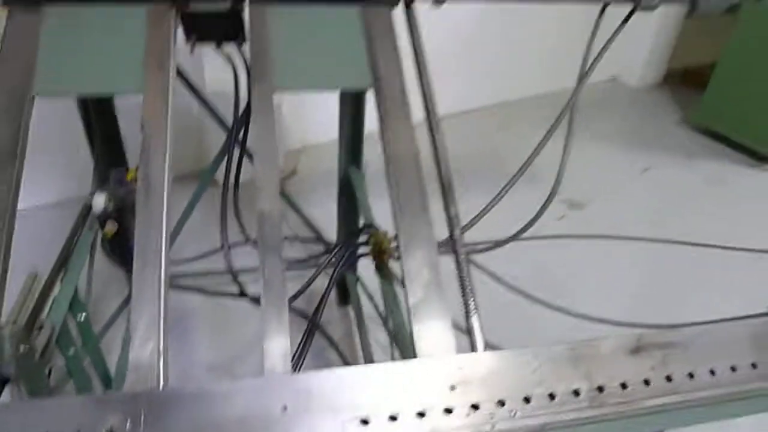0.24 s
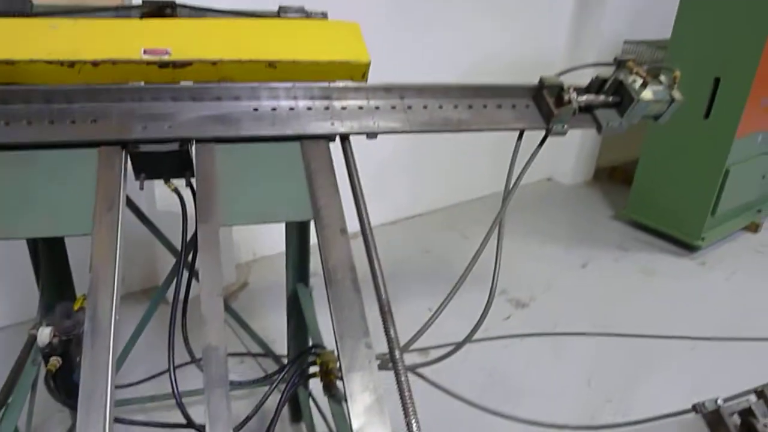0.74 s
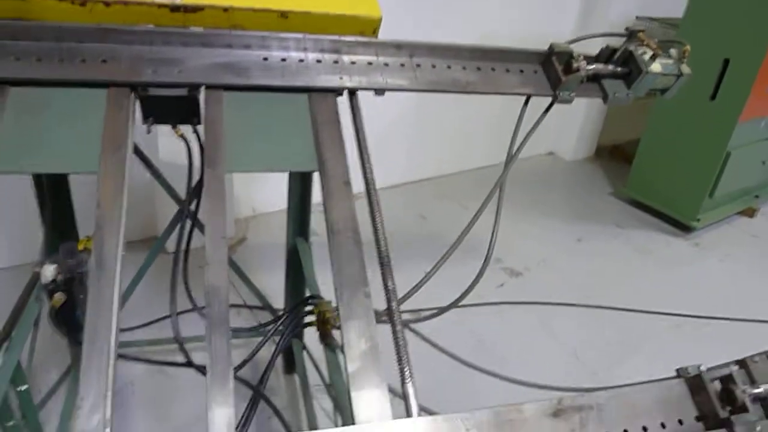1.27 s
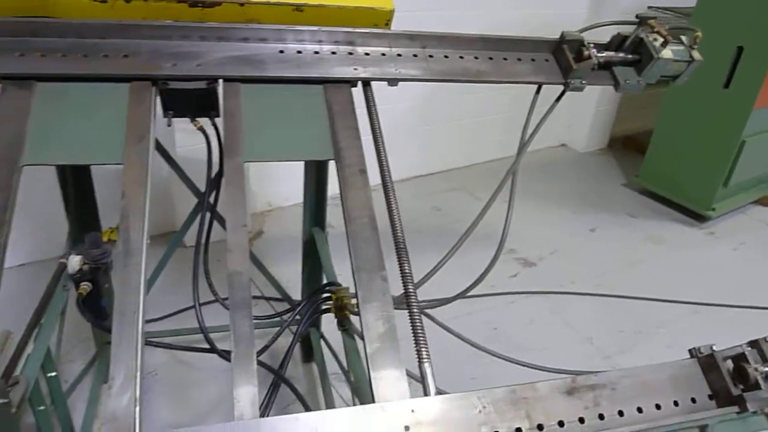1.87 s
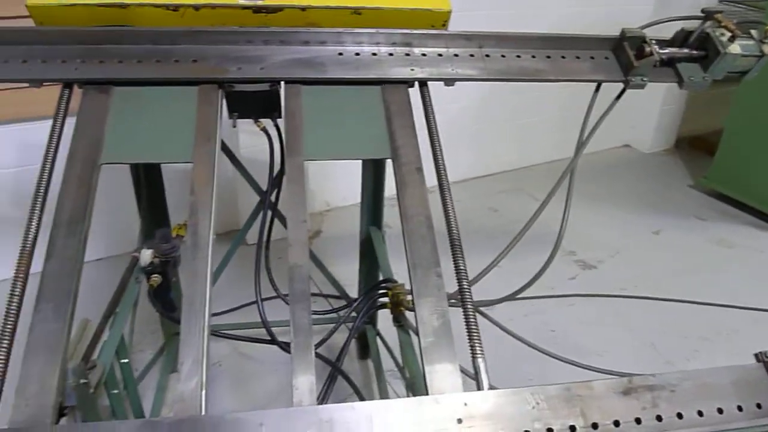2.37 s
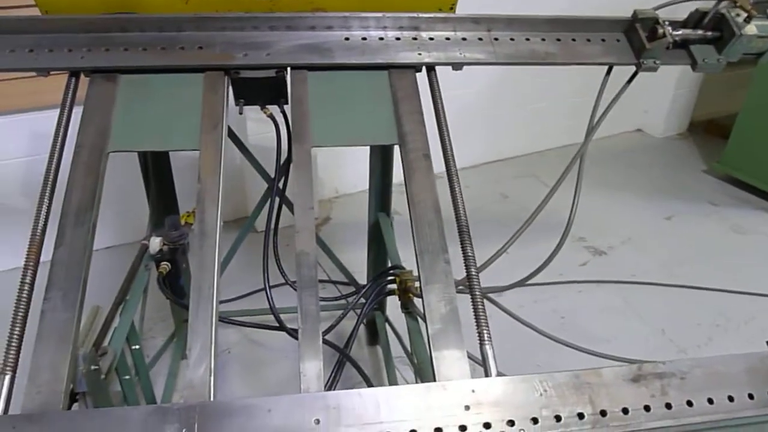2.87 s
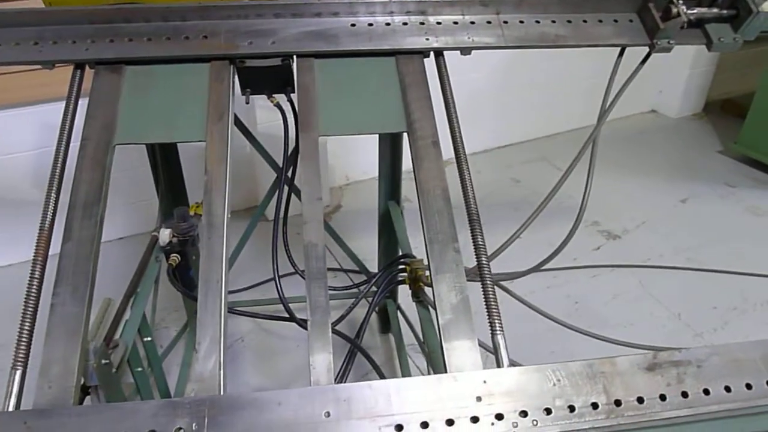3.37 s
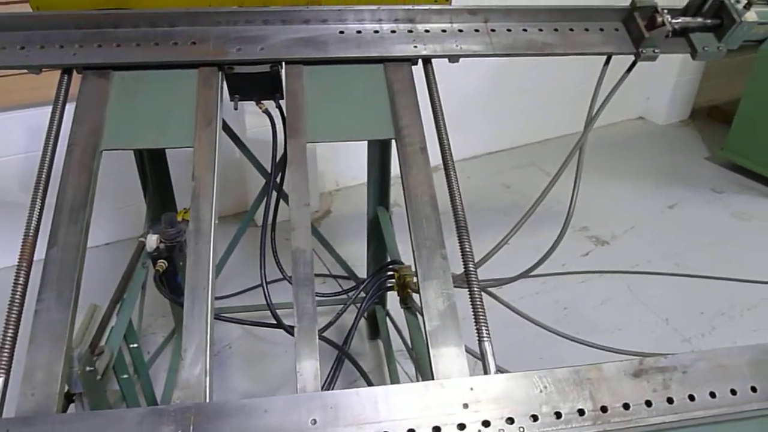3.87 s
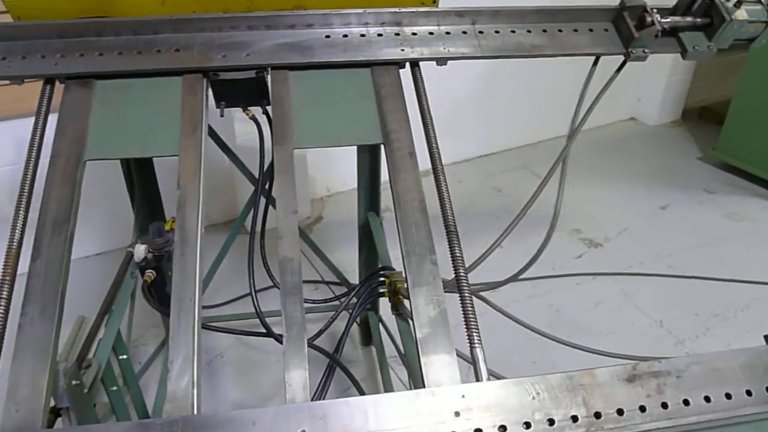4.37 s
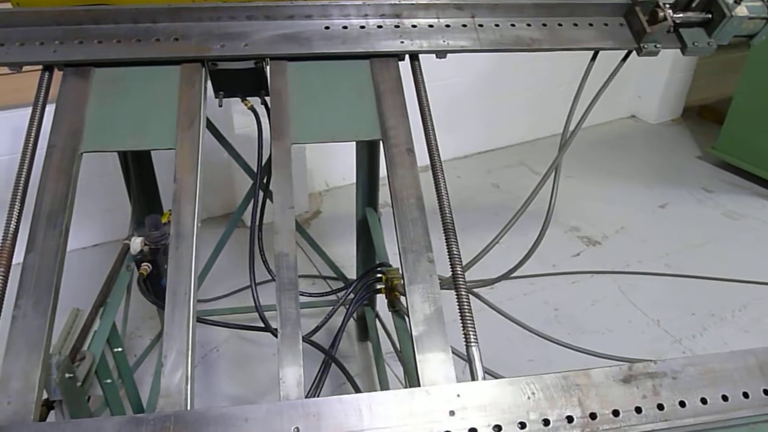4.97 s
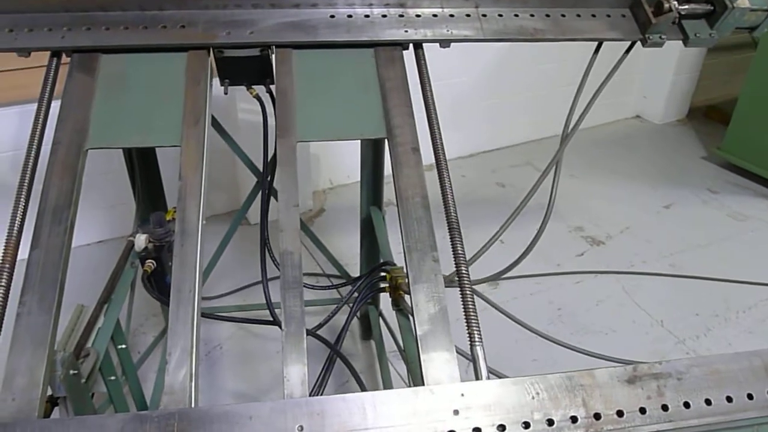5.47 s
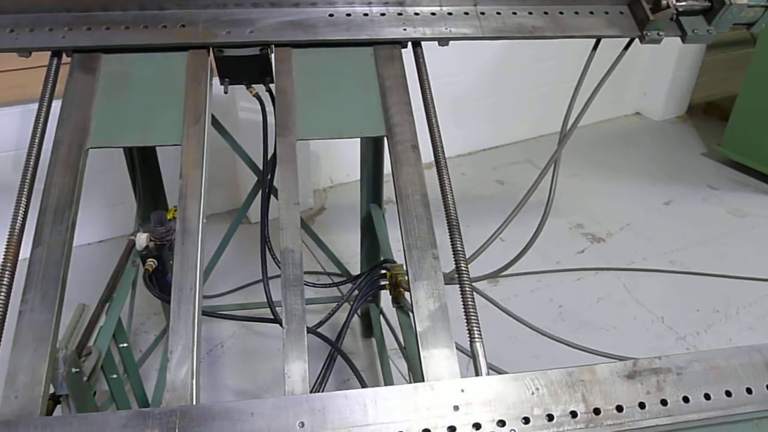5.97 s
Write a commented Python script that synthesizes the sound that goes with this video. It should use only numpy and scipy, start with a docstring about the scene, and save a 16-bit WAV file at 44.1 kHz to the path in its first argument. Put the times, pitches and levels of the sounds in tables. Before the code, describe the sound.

In an indoor workshop, a small steel latch snaps almost at once over faint mains hum, buzz and ventilation. Quiet follows until a pneumatic valve spits and knocks, a cylinder thumps, and a bright air jet hisses for about a second. With another knock the air dumps into a hollow steel frame, roaring and ringing as it sinks. A small microphone gives thin bass and dulled extreme treble.

```python
"""Thin hiss over mains hum, electrical buzz and shop air; at once a steel latch snaps.
Later a valve spits, a cylinder thumps and a jet hisses hard for a second: shaped noise through port resonances.
Then the cylinder dumps its air into a hollow steel frame: surging noise rings the tube's resonances and sinks.
Contacts are short pushes that ring decaying modes, each with one rebound; hum is a set of mains multiples."""
import sys
import numpy as np
from scipy import signal
from scipy.fft import rfft, irfft
from scipy.io import wavfile
from scipy.ndimage import uniform_filter1d

SR = 44100
rng = np.random.default_rng(int(sys.argv[2]) if len(sys.argv) > 2 else 0)


def dump(signal):
    """Clip the signal to [-1, 1] and save it as 16-bit WAV at the path in sys.argv[1]."""
    limited = np.clip(np.atleast_2d(signal).T, -1, 1)
    pcm = np.round(limited * 32767).astype(np.int16)
    wavfile.write(sys.argv[1], SR, pcm)


N = 275184
T = np.arange(N) / SR

# jet noise spectrum: (frequency [Hz], level [dB])
JET_SPECTRUM = [(24, -68.5), (40, -41), (80, -23), (192, -16.5), (353, -15.5), (571, -9.5), (1030, -10),
                (1170, -4), (1280, -7.5), (1550, -5), (2570, -5.5), (3480, -2.5), (6270, -8), (7300, -14.5),
                (9000, -12)]
# port resonances: (frequency [Hz], width [Hz], gain re hiss [dB])
PORT_RESONANCES = [(1399, 15, -2.5), (2090, 15, -1.5), (2423, 13, 1), (2808, 13, 1), (3238, 15, 1.5),
                   (3305, 13, -1), (3538, 30, 1.5), (3745, 15, 0), (3898, 18, -4), (4185, 100, -10)]
JET_OPEN_S, JET_SHUT_S = 4.228, 5.345
# overshoot at opening, then a creep up with the pressure
JET_DB, JET_RISE_DB_PER_S, OVERSHOOT_DB, OVERSHOOT_T60_S = -22.5, 1.4, 18, 0.08

# exhaust noise spectra, roar and spray: (frequency [Hz], level [dB])
ROAR_SPECTRUM = [(30, -46), (75, -11), (200, -8.5), (420, -8), (560, -3.5), (750, -2.5), (880, -1.5),
                 (1150, -4.5), (1620, -5), (1850, -9), (2600, -12), (4000, -18), (7000, -47)]
SPRAY_SPECTRUM = [(1200, -5.5), (2500, -0.5), (3200, -5), (4700, -3), (6000, -8.5), (7200, -16.5)]
# air column of the frame tube: (frequency [Hz], width [Hz], gain re roar [dB])
TUBE_RESONANCES = [(87.5, 8, 7), (265.5, 5, 9), (364, 7, -1), (481, 7, .5), (535, 6, -.5), (562.5, 6, 7),
                   (603, 6, 0), (659.5, 6, 6), (866, 9, 3), (936.5, 6, 4.5), (1090.5, 7, 4), (1272.5, 6, 7),
                   (1383, 9, -.5), (1594, 9, 2), (1626, 9, -.5)]
# exhaust surges: (time [s], roar lift [dB], spray lift [dB])
EXHAUST_SURGES = [(5.339, 9.5, 7), (5.455, 3.5, 5), (5.525, 3, 5.5), (5.893, -5, 16)]
EXHAUST_OPEN_S, SURGE_RISE_S, SURGE_T60_S = 5.341, 0.005, 0.24
# the roar holds while the piston travels, then sinks with the pressure; the spray sinks from the start
ROAR_DB, ROAR_HOLD_S, ROAR_SINK_DB_PER_S = -25, 0.26, 27.5
SPRAY_DB, SPRAY_SINK_DB_PER_S = -32.5, 20
# flutter as air tumbles in the tube; ringing stands out more as the flow calms
FLUTTER_RMS_DB, FLUTTER_PER_S = 1.36, 70
RING_DB, RING_RISE_DB_PER_S = -0.5, 6

# latch contacts: (time [s], peak [dB], contact pitch [Hz], rebound re contact [dB])
LATCH_CONTACTS = [(.1498, -30, 1600, -19), (.1594, -8, 1470, -5), (.1641, -0.5, 2030, -9.5),
                  (.1728, -16, 1530, -2), (.1980, -40, 1700, -14), (.2067, -26, 3000, -22),
                  (.3090, -31, 2450, -8), (.3195, -37, 1900, -8), (.5930, -31, 2220, -12)]
# latch ringing: (frequency [Hz], t60 [s], level [dB])
LATCH_RINGING = [(865, .02, -13), (1465, .025, 0), (1712, .02, -5), (2035, .017, 2), (2350, .01, -5),
                 (3010, .011, -4), (4050, .011, -4), (5150, .012, -8)]
# blows on clamp and frame, last a faint valve spool click:
# (time [s], peak [dB], push centre [Hz], rebound re blow [dB])
KNOCK_CONTACTS = [(.1598, -26.5, 364, -5.5), (4.0838, -14, 490, -7), (4.2272, -7, 1700, -15),
                  (4.2299, 1, 563, -12), (4.2432, -12.5, 900, 0.5), (4.2585, -12, 1200, -8),
                  (4.8215, -10, 2500, -21), (5.3415, -4, 1200, -10), (5.3480, -4, 1200, -14),
                  (5.3820, -8.5, 700, -5), (5.4150, -27, 1200, -16), (5.8960, -24, 5000, -2)]
# body ringing: (frequency [Hz], t60 [s], level [dB])
BODY_RINGING = [(181, 0.076, -14.5), (307, 0.035, -17), (535, 0.0083, 9), (950, 0.032, -2),
                (1544, 0.055, -4), (2750, 0.0091, 3)]
# rebound delay after a contact; steel clicks before the body takes the push
REBOUND_S, CLICK_LEAD_S = 0.0036, 0.0007

# valve spits: (time [s], spit level [dB], dying leak level [dB])
VALVE_SPITS = [(4.0825, -19.5, -32), (5.8950, -28, -36.5)]
# spit noise spectrum: (frequency [Hz], level [dB])
SPIT_SPECTRUM = [(80, -2), (300, 9.5), (600, 3.5), (1100, -3), (2600, -4.5), (4100, 0.5), (5300, 0.5),
                 (6000, -1), (6900, -6.5), (8000, -8)]
# valve body resonances: (frequency [Hz], width [Hz], gain re spit noise [dB])
VALVE_RESONANCES = [(4200, 63, -9), (4770, 70, -1.5), (5846, 50, 6), (6080, 68, -2), (7400, 60, 10)]

# hum partials: (multiple of the mains [1], level before sway and shading [dB])
HUM_PARTIALS = [(1, -67), (2, -61.5), (4, -57), (6, -56.5), (8, -55.5), (14, -66.5), (18, -63.5),
                (20, -67.5), (22, -59.5), (24, -68), (26, -66.5), (28, -65.5), (30, -67.5), (36, -69),
                (40, -67.5), (66, -73), (68, -75), (90, -74.5), (94, -71), (98, -73), (106, -70.5)]
# spectra of buzz and ventilation air: (frequency [Hz], level [dB])
BUZZ_SPECTRUM = [(450, -12.5), (700, -12), (1500, -1), (2600, -3), (3400, -1), (4300, 0.5), (5000, -2.5),
                 (5700, -1), (6700, 2), (7300, -17.5)]
AIR_SPECTRUM = [(25, -8.5), (60, -1.5), (90, -2), (120, 3), (170, 1.5), (238, 2), (300, -1), (600, -1.5),
                (1150, -0.5), (1500, -5), (2100, -6), (2700, -12), (4500, -14.5), (7200, -22)]
MAINS_HZ = 60
# upper partials come out from behind the frame as the listener steps up
SHADE_DB, CLEAR_S, CLEAR_RAMP_S = -6.5, 0.34, 0.1
# the ventilation air swells for a moment
GUST_S, GUST_WIDTH_S, GUST_DB = 3.17, 0.12, 2
# background drops at DIP_S, recovers from the dip, rises until SWELL_S, then sinks
DIP_S, DIP_DB, DIP_T60_S = 0.19, -3, 0.49
SWELL_S, SWELL_DB_PER_S = 2.7, 0.87

# microphone treble: (frequency [Hz], gain [dB])
MIC_RESPONSE = [(7100, -0.5), (7500, -11.5), (7950, -24.5), (8700, -28), (9400, -68)]
TOP_HZ = 15800


def undb(db):
    """Decibels to gain."""
    return 10 ** (np.asarray(db) / 20)


def unit(x):
    """Scale to rms 1."""
    return x / np.sqrt(np.mean(x ** 2))


def gain_at(hz, points):
    """Gain of a (Hz, dB) spectrum, interpolated in dB over log frequency."""
    point_hz, point_db = np.transpose(points)
    return undb(np.interp(np.log(np.maximum(hz, 1)), np.log(point_hz), point_db))


def noise(points):
    """Noise of rms 1 with the given spectrum."""
    white = rfft(rng.standard_normal(N))
    return unit(irfft(white * gain_at(np.fft.rfftfreq(N, 1 / SR), points), N))


def walk(rate_hz):
    """Smooth random drift of rms 1 with rate_hz new values a second."""
    step = int(SR / rate_hz)
    held = np.repeat(rng.standard_normal(N // step + 1), step)
    return unit(uniform_filter1d(held, step)[:N])


def fade(t, t60_s):
    """Exponential decay from t = 0, silent before."""
    return (t >= 0) * np.exp(-np.log(1000) * np.maximum(t, 0) / t60_s)


def opening(start_s, ramp_s):
    """Linear ramp from 0 to 1."""
    return np.clip((T - start_s) / ramp_s, 0, 1)


def highpass(x, hz, order):
    """Butterworth cut of the bass below hz."""
    return signal.sosfilt(signal.butter(order, hz, "high", fs=SR, output="sos"), x)


def resonate(x, peaks):
    """The sound plus its ringing in narrow (Hz, width Hz, dB) resonances."""
    out = x
    for hz, width_hz, db in peaks:
        b, a = signal.iirpeak(hz, hz / width_hz, SR)
        out = out + undb(db) * signal.lfilter(b, a, x)
    return out


def room(x, t60_s, wet_db):
    """Direct sound and a dense decaying tail of reflections from floor, frame and walls."""
    t = T[:SR // 2]
    tail = rng.standard_normal(len(t)) * fade(t - .002, t60_s)
    wet = signal.fftconvolve(x, tail / np.linalg.norm(tail))[:N]
    return (x + undb(wet_db) * wet) / np.hypot(1, undb(wet_db))


def exhaust():
    """The emptying cylinder blows into the frame tube; roar and spray surge and sink with the pressure."""
    age_s = np.maximum(T - EXHAUST_OPEN_S, 0)
    roar_db = ROAR_DB - ROAR_SINK_DB_PER_S * np.maximum(age_s - ROAR_HOLD_S, 0)
    spray_db = SPRAY_DB - SPRAY_SINK_DB_PER_S * age_s
    for surge_s, roar_lift_db, spray_lift_db in EXHAUST_SURGES:
        surge = opening(surge_s, SURGE_RISE_S) * fade(T - surge_s, SURGE_T60_S)
        roar_db = roar_db + roar_lift_db * surge
        spray_db = spray_db + spray_lift_db * surge
    flow = opening(EXHAUST_OPEN_S, .0015) * undb(FLUTTER_RMS_DB * walk(FLUTTER_PER_S))
    rush = noise(ROAR_SPECTRUM) * flow * undb(roar_db)
    ringing = resonate(rush, TUBE_RESONANCES) - rush
    roar = rush + ringing * undb(RING_DB + RING_RISE_DB_PER_S * age_s)
    spray = noise(SPRAY_SPECTRUM) * flow * undb(spray_db)
    return room(roar + spray, t60_s=0.51, wet_db=-13.5)


def jet():
    """Turbulent air at full pressure, coloured by the port and by nearby steel."""
    age_s = T - JET_OPEN_S
    overshoot_db = OVERSHOOT_DB * fade(age_s, OVERSHOOT_T60_S)
    flutter_db = .3 * walk(40)
    flow = undb(JET_DB + JET_RISE_DB_PER_S * age_s + overshoot_db + flutter_db)
    gate = opening(JET_OPEN_S, 0.011) * (1 - opening(JET_SHUT_S, 0.016))
    hiss = unit(resonate(noise(JET_SPECTRUM), PORT_RESONANCES))
    return room(hiss * flow * gate, t60_s=0.26, wet_db=-13)


def contacts(table, click_hz, click_db, click_db_per_db):
    """Each contact and its rebound give a dull push and a steel click that grows with force: (s, dB, Hz)."""
    rows = []
    for contact_s, contact_db, hz, rebound_db in table:
        for when_s, db in [(contact_s, contact_db), (contact_s + REBOUND_S, contact_db + rebound_db)]:
            rows.append((when_s, db, hz))
            rows.append((when_s - CLICK_LEAD_S, click_db + click_db_per_db * db, click_hz))
    return rows


def strikes(rows, modes, push_db, ping_db, rattle_db, rattle_t60_s):
    """A short push is heard directly, pings the small part, rings the body and sets it rattling."""
    out, t = np.zeros(N), T[:SR // 8]
    lead = 256  # samples ahead of the push centre
    ring = sum(undb(db) * fade(t, t60_s) * np.sin(2 * np.pi * hz * t) for hz, t60_s, db in modes)
    for strike_s, peak_db, hz in rows:
        u = 2 * np.pi * hz * (t - t[lead])
        push = u / (1 + u ** 2) ** 2
        ping = np.sin(2 * np.pi * hz * t) * fade(t, 14 / hz)
        rattle = rng.standard_normal(len(t)) * fade(t, rattle_t60_s)
        hit = undb(push_db) * push / push.max()
        for part_db, part in [(0, ring), (ping_db, ping), (rattle_db, rattle)]:
            answer = signal.fftconvolve(push, part)[:len(t)]
            hit = hit + undb(part_db) * answer / abs(answer).max()
        start = int(strike_s * SR) - lead
        out[start:start + len(t)] += undb(peak_db) * hit / abs(hit).max()
    return out


def knocks():
    """Blows and a faint spool click ring the body's modes into the room."""
    rows = contacts(KNOCK_CONTACTS, click_hz=2930, click_db=-16.5, click_db_per_db=4.0)
    struck = strikes(rows, BODY_RINGING, push_db=7.5, ping_db=-9.5, rattle_db=0, rattle_t60_s=0.018)
    return room(struck, t60_s=0.47, wet_db=-17.5)


def latch():
    """Small steel contacts ring the latch; a part this small radiates little bass."""
    rows = contacts(LATCH_CONTACTS, click_hz=4200, click_db=-6.0, click_db_per_db=1.6)
    struck = strikes(rows, LATCH_RINGING, push_db=-14, ping_db=-1, rattle_db=-6.5, rattle_t60_s=0.028)
    return highpass(struck, 1030, order=3)


def spits():
    """The valve spits sharply, then the small trapped volume leaks away; the valve body sings along."""
    flow = np.zeros(N)
    for spit_s, spit_db, leak_db in VALVE_SPITS:
        flow += undb(spit_db) * fade(T - spit_s, 0.039)
        flow += undb(leak_db) * fade(T - spit_s, 0.89)
    hiss = unit(resonate(noise(SPIT_SPECTRUM), VALVE_RESONANCES))
    return room(hiss * flow, t60_s=.12, wet_db=-11.5)


def hum():
    """Iron cores hum on mains multiples; the listener moves through their standing waves."""
    tones = np.zeros(N)
    shade_db = SHADE_DB * (1 - opening(CLEAR_S, CLEAR_RAMP_S))
    for multiple, db in HUM_PARTIALS:
        # short waves are shaded, and sway more
        sway_db = .25 * np.sqrt(multiple) * walk(1.1) + shade_db * (multiple > 4)
        tone = np.sin(2 * np.pi * (multiple * MAINS_HZ * T + rng.random()))
        tones += undb(db + sway_db) * np.sqrt(2) * tone
    return tones


def buzz():
    """Loose laminations buzz on every mains multiple, the even ones stronger."""
    cycle = SR // MAINS_HZ
    k = np.arange(cycle // 2 + 1)
    strength = gain_at(k * MAINS_HZ, BUZZ_SPECTRUM) * undb(-4 * (k % 2)) * (k > 0)
    # six paths, whose shares shift while their total power holds
    paths = []
    for phase in rng.random(size=(6, len(k))):
        one_cycle = irfft(strength * np.exp(2j * np.pi * phase), cycle)
        paths.append(np.resize(one_cycle, N))
    shares = np.array([walk(0.88) for _ in paths])
    mixed = np.sum(shares * paths, axis=0) / np.linalg.norm(shares, axis=0)
    return undb(-56.0) * unit(mixed)


def air():
    """Ventilation air: shaped noise that wavers and swells once."""
    gust_db = GUST_DB * np.exp(-((T - GUST_S) / GUST_WIDTH_S) ** 2)
    return noise(AIR_SPECTRUM) * undb(-50.0 + gust_db + .5 * walk(6.8))


def shop():
    """Hum, buzz and air share one slow level; a thin hiss lasts until the latch snaps shut."""
    leak = noise(SPRAY_SPECTRUM) * undb(-51.0) * (1 - opening(0.14, .01))
    after_db = DIP_DB * fade(T - DIP_S, DIP_T60_S) - SWELL_DB_PER_S * abs(T - SWELL_S)
    level = undb(after_db * opening(DIP_S, .01))
    return (hum() + buzz() + air()) * level + leak


def scene():
    """Air, knocks and latch over the shop's background, as one channel."""
    return (exhaust() + jet() + knocks() + latch() + spits() + shop())[None]


def record(dry):
    """A small microphone: thin bass, a top that ends early, and the hardest peaks rounded off."""
    spectrum = rfft(highpass(dry, 32, order=2), 2 * N)
    response = gain_at(np.fft.rfftfreq(2 * N, 1 / SR), MIC_RESPONSE)
    heard = irfft(spectrum * response)[:, :N]
    rounded = heard / (1 + (heard / .73) ** 16) ** (1 / 16)
    return signal.sosfilt(signal.ellip(7, .3, 60, TOP_HZ, fs=SR, output="sos"), rounded)


dry = scene()
out = record(dry)
dump(out)
```